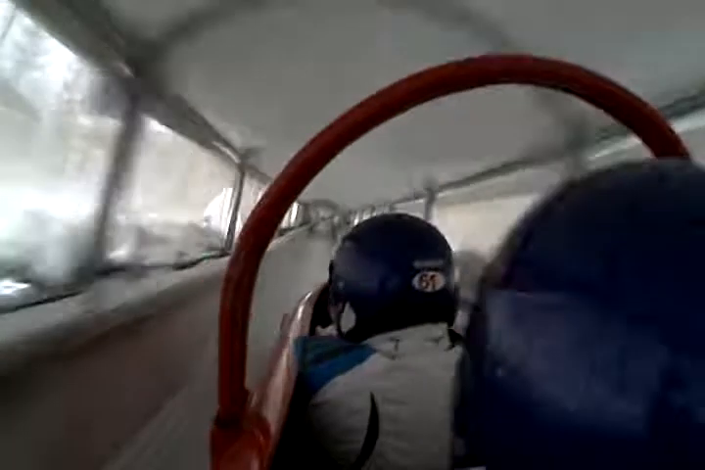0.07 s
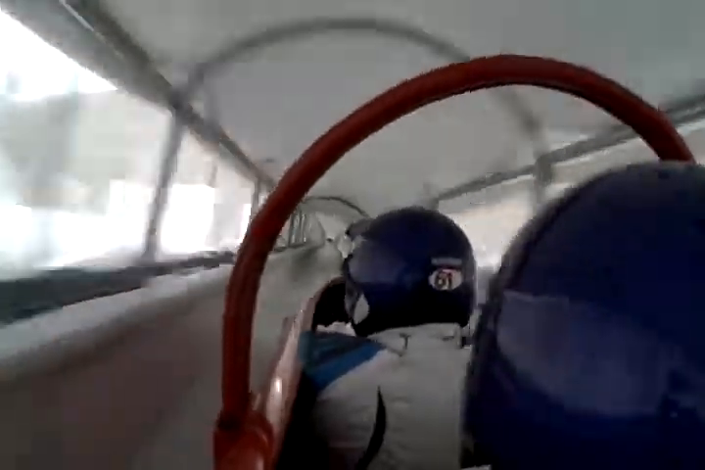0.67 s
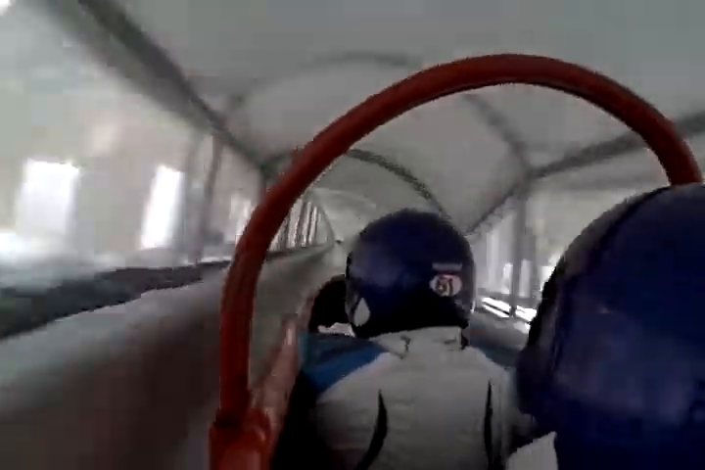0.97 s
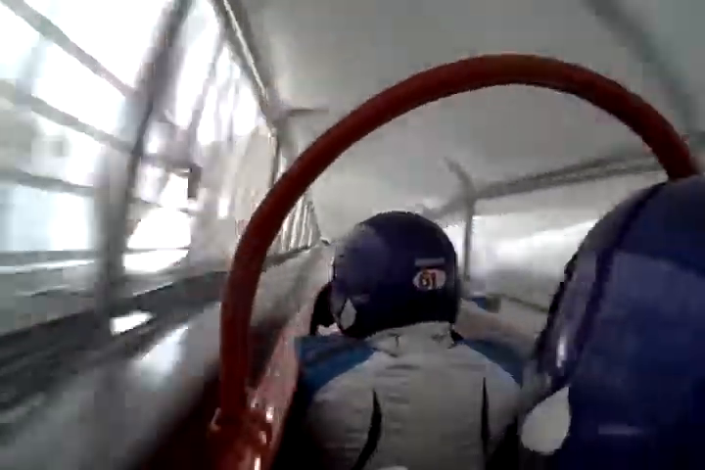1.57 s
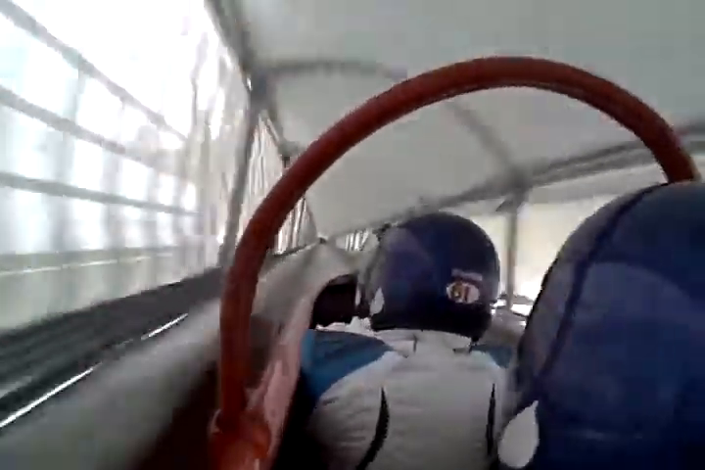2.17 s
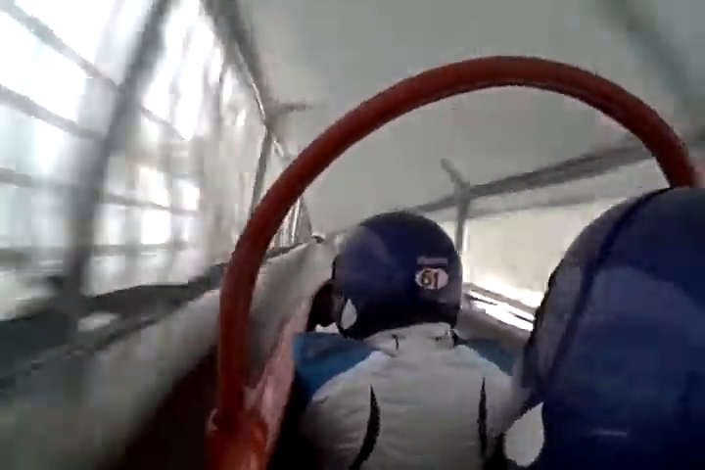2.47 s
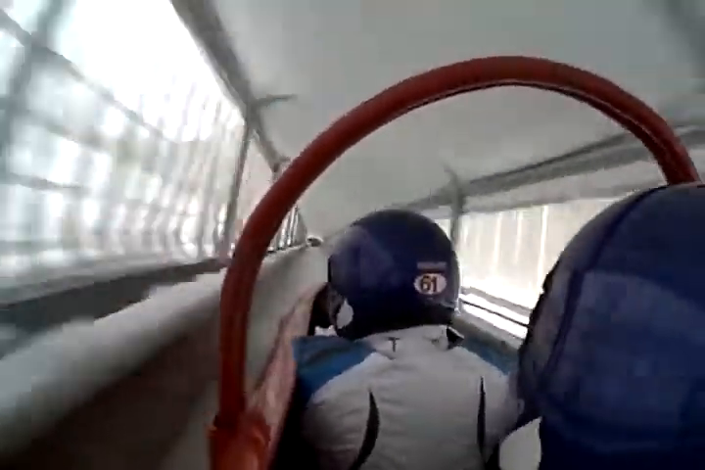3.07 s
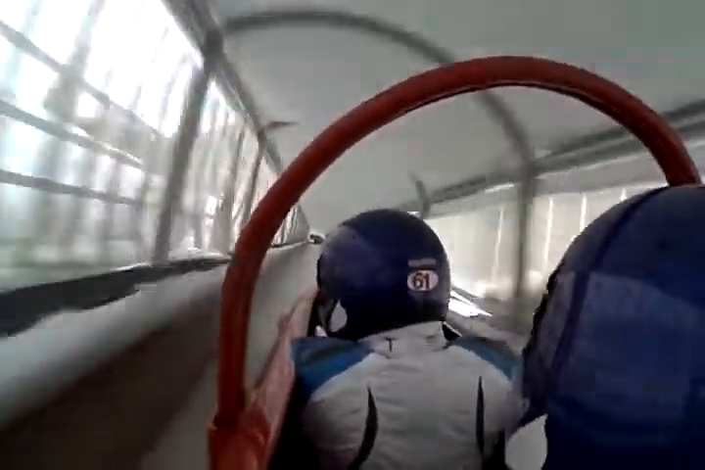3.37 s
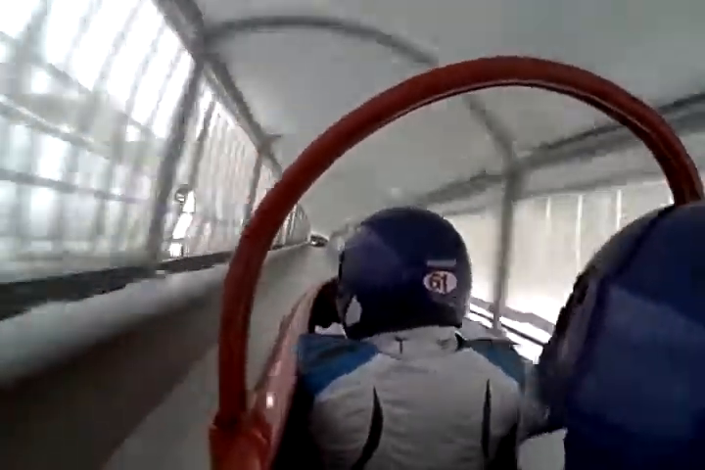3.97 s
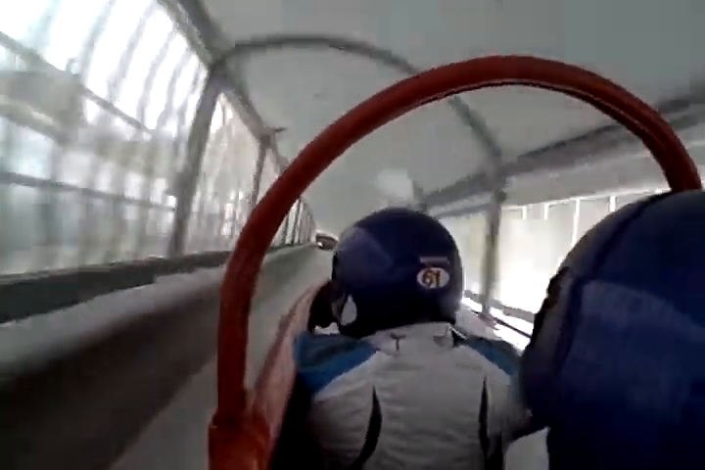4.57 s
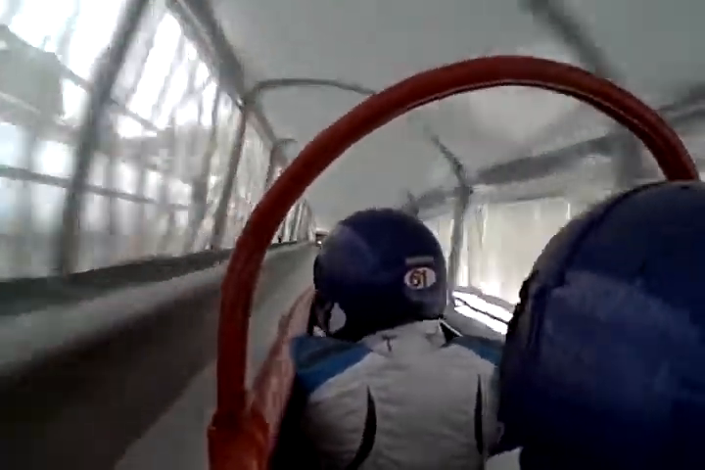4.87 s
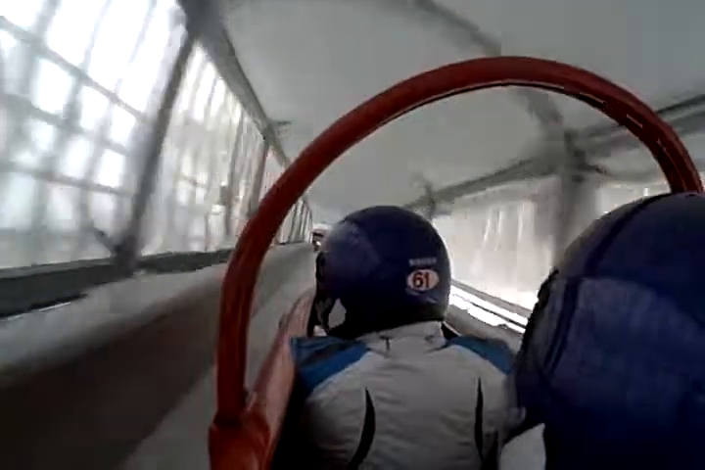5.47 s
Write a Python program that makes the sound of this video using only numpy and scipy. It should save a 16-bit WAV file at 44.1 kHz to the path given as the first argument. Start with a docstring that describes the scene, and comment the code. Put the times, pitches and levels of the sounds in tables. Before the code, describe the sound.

A bobsleigh runs down a roofed ice track for about five and a half seconds, heard close and muffled from a microphone in a closed case on board. The runners make a continuous low, juddering rumble with a midrange scrape, swelling over rough patches and throwing faint spurts of ice. Sharp, hollow ticks hit the case irregularly throughout. Low buffets of air push on it, strongest near 0.2, 1.2 and 3.4 seconds. The hull knocks once at 0.6 seconds, bangs in a quick, loud cluster from 1.7 to 2, and knocks again at 2.4. The rumble eases around 3.5 seconds, then returns abruptly at 3.75 with more knocks and rattling ticks until about 4.4. A duller thump lands near 5 seconds. From about 4 seconds a faint airy hiss grows, with thin wavering whistles and a slight ringing of the runners, continuing to the end.

```python
"""Bobsleigh ride

A bobsleigh runs down a roofed ice track, heard from a camera in a closed case on board.
Its runners (the steel blades) rumble over rough ice and throw up chips. The hull bangs against
the wall, sharp ticks hit the case, and swirls of air push on it. Late in the ride, as the sled
gets faster, a hiss grows, with thin whistles and a faint singing of the runners."""
import sys
import numpy as np
from scipy import signal
from scipy.fft import rfft, irfft, next_fast_len
from scipy.io import wavfile
from scipy.ndimage import uniform_filter1d

SR = 44100
rng = np.random.default_rng(int(sys.argv[2]) if len(sys.argv) > 2 else 0)


def waveform_to_disk(signal):
    """Save audio, clipped to [-1, 1], as 16-bit WAV at the path in sys.argv[1]."""
    frames = np.transpose(np.atleast_2d(signal))
    scaled = np.clip(frames, -1, 1) * 32767
    samples = np.round(scaled).astype(np.int16)
    wavfile.write(sys.argv[1], SR, samples)


N = 242991
TIME = np.arange(N) / SR


def runners(rumble_trim_db=0.72, scrape_trim_db=-1.38, boom_db=-31, boom_follows=0.52,
            spray_db=-62.5, spray_follows=1.11, judder_db=2.0, spray_judder_db=2.5):
    """Bumps in the ice shake the sled; rough patches make it louder, and its load judders."""
    # how hard the runners work on the ice: t/s, rumble/dB, scrape/dB (before the trims)
    ride = [(0, -27.5, -36), (0.35, -28.5, -35), (0.647, -29.5, -36.5), (0.97, -35.5, -42),
            (1.681, -36, -44), (1.81, -29, -29), (2.05, -31.5, -40), (2.801, -35, -44),
            (3.25, -37.5, -43.5), (3.45, -42, -52), (3.744, -37.5, -47.5), (3.77, -28, -33.5),
            (4.0, -30.5, -38.5), (4.361, -27, -33.5), (4.498, -28.5, -35.5), (4.75, -28.5, -31.5),
            (5.068, -33, -36.5), (5.261, -29, -29), (5.5, -32, -29)]
    # rough patches of ice: t/s, rise of rumble and scrape/dB, rise of boom/dB, length/s
    patches = [(0.037, 0.5, 4, 0.036), (0.242, 1.5, 6.5, 0.048), (0.323, 6.5, -0.5, 0.05),
               (0.385, 0, 13, 0.022), (0.83, 4.5, 6, 0.066), (1.142, 8, 5, 0.11), (1.388, 5.5, 1, 0.11),
               (1.637, 7, 7.5, 0.042), (2.38, 4, 2.5, 0.074), (2.667, 9, 6, 0.029), (2.944, 6.5, 4, 0.08),
               (3.876, 6.5, 10, 0.044), (4.2, 2.5, 9, 0.029), (4.431, 6, 4, 0.026)]
    # tone of the hull's boom, the rumble, the scrape and the ice spray: f/Hz, relative level/dB
    boom_tone = [(25, -17.5), (42, -0.5), (62, -3.5), (90, -1), (120, -3.5), (165, -4.5), (230, -23.5),
                 (400, -35.5)]
    rumble_tone = [(120, -26.5), (175, 0), (222, 4), (270, -3.5), (330, -0.5), (400, -6), (480, -7),
                   (560, -4.5), (680, -14.5), (850, -21.5), (1400, -55.5)]
    scrape_tone = [(400, -26), (620, 3), (760, 5), (880, 6), (1000, 1.5), (1100, -3.5), (1190, -4.5),
                   (1350, -11), (1600, -19), (2100, -40), (3000, -56.5), (6000, -58)]
    spray_tone = [(700, -10.5), (1300, 3), (1900, 4.5), (2100, 2), (2400, 0), (3000, -5), (3600, -8),
                  (4500, -18), (5500, -19.5), (8000, -25)]
    times, rumbles, scrapes = np.transpose(ride)
    ride_db = np.interp(TIME, times, rumbles)
    rough_db = sum(db * swell(s, length_s) for s, db, _, length_s in patches)
    heave_db = sum(db * swell(s, length_s) for s, _, db, length_s in patches)
    # the boom follows the rumble, but swings less
    boom_gain = from_db(boom_db + boom_follows * (ride_db - ride_db.mean()) + heave_db)
    rumble_gain = from_db(ride_db + rough_db)
    scrape_gain = from_db(np.interp(TIME, times, scrapes) + rough_db)
    # the rougher the ride, the more ice the runners throw
    work_db = 10 * np.log10(rumble_gain * scrape_gain)
    spray_gain = from_db(spray_db + spray_follows * (work_db - work_db.mean()))
    load = drift(30)
    bumps = grains(per_s=4000, spread_db=2.0) * from_db(judder_db * load)
    ridges = grains(per_s=2600, spread_db=2.0) * from_db(judder_db * load)
    chips = grains(per_s=9000, spread_db=2.5) * from_db(spray_judder_db * load)
    boom = boom_gain * rms_one(colour(rng.standard_normal(N), boom_tone))
    rumble = from_db(rumble_trim_db) * rumble_gain * rms_one(colour(bumps, rumble_tone))
    scrape = from_db(scrape_trim_db) * scrape_gain * rms_one(colour(ridges, scrape_tone))
    spray = spray_gain * rms_one(colour(chips, spray_tone))
    return boom + rumble + scrape + spray


def knocks(attack_s=0.0017, soft_extra_s=0.0045, soft_hz=480, hard_db=-26, steady_s=0.014,
           floor_attack_s=0.0047):
    """Each blow rings the hull, crushes ice and thumps the floor; soft ones are dull and rise slowly."""
    # the hull hits a wall or bump: t/s, level/dB, contact/s, decay/s, relative crunch/dB, thump/dB
    blows = [(0.572, -16, 0.0037, 0.079, -52, -19.5), (1.734, -15.5, .003, 0.13, -45, -6.5),
             (1.769, -12.5, 0.0086, 0.075, -14, -15), (1.798, -20, 0.018, 0.099, -26.5, -29),
             (1.8694, -16.5, 0.0094, 0.095, -17.5, -16), (1.947, -20.5, 0.003, 0.15, -27.5, -32),
             (2.431, -20, .003, 0.14, -29, -33), (3.29, -46.5, 0.0079, 0.2, -40, -22),
             (3.752, -18.5, 0.017, 0.055, -29.5, -21.5), (3.811, -26.5, .003, 0.046, -18, -25),
             (3.867, -22.5, 0.0059, 0.089, -25.5, -24.5), (3.888, -22, 0.0083, 0.059, -27, -27.5),
             (4.169, -25, 0.0036, 0.037, -23, -22), (4.344, -21, 0.023, 0.19, -28.5, -20),
             (5.049, -25, 0.0071, 0.19, -35, -16.5)]
    # tone of crushed ice: f/Hz, relative level/dB
    crunch_tone = [(500, -9.5), (950, 11), (1350, 2), (1750, 6), (1980, 5), (2150, -1), (2400, -1),
                   (3400, -11), (4200, -20), (6000, -26.5), (7500, -35.5)]
    # the floor panel's dull ring: f/Hz, relative level/dB, time to fade by 60 dB/s
    floor_modes = [(282, 0, 0.061), (482, -12, 0.13)]
    contacts = grains(per_s=5000, spread_db=3.5)
    ringing = hull(contacts)
    bang = even(ringing, steady_s)
    thud = even(signal.sosfilt(signal.butter(3, soft_hz, fs=SR, output="sos"), ringing), steady_s)
    crunch = even(colour(contacts, crunch_tone), steady_s)
    out = np.zeros(N)
    for s, db, contact_s, decay_s, crunch_db, thump_db in blows:
        span = slice(int(s * SR), int((s + .5) * SR))
        age = TIME[span] - TIME[span][0]
        hardness = min(from_db(crunch_db - hard_db), 1)  # more crunch means a harder blow
        rise = (1 - np.exp(-age / (attack_s + soft_extra_s * (1 - hardness)))) ** 2
        hold_then_fade = from_db(db - 60 * np.maximum(age - contact_s, 0) / decay_s)
        body = hardness * bang[span] + np.sqrt(1 - hardness ** 2) * thud[span]
        out[span] += rise * hold_then_fade * (body + from_db(crunch_db) * crunch[span])
        floor = sum(from_db(mode_db - 60 * age / fade_s) * np.sin(2 * np.pi * hz * age)
                    for hz, mode_db, fade_s in floor_modes)
        out[span] += from_db(thump_db) * (1 - np.exp(-age / floor_attack_s)) * floor
    return out


def hull(x, damping_hz=1700):
    """The sled's shell rings at its own pitches (its modes) and lets little treble through."""
    # the shell's modes: f/Hz, width/Hz, relative level/dB
    hull_modes = [(222.4, 37, 4), (275, 51, -4.5), (323, 59, 3), (517, 80, 2), (573.5, 35, 10.5),
                  (925, 178, 1.5), (992, 116, -1), (1180, 20, -32.5)]
    return signal.sosfilt(signal.butter(3, damping_hz, fs=SR, output="sos"), modes(x, hull_modes))


def ticks(crack_boost_db=21, ring_boost_db=29.5, ring_ratio=1.338, ring_lag_s=0.00024, thump_db=-8,
          thump_band_hz=(300, 720), spot_db=2.5, spot_detune=0.062, notch_hz=2100, notch_width_hz=230):
    """A hit on the case gives a faint crack, then a very short, hollow ring over a duller thump."""
    # small hard hits: t/s, crack/dB, ring/dB (both before the boosts), ring pitch/Hz
    hits = [(.15, -28, -16.5, 874), (.3131, -29, -18.5, 1010), (0.5441, -27, -12.5, 905),
            (0.7915, -27.5, -16.5, 885), (.962, -38, -23, 905), (1.127, -23, -13.5, 867),
            (1.3602, -32.5, -15, 880), (1.452, -43, -22, 875), (1.7247, -43, -26.5, 900),
            (1.7724, -30, -23, 850), (1.7872, -33, -16, 860), (1.8178, -28, -17, 870),
            (1.9423, -28.5, -16, 885), (2.2425, -38, -23.5, 906), (2.325, -44, -32, 990),
            (2.3553, -40, -20.5, 910), (2.378, -44, -31, 1010), (2.436, -44, -24.5, 840),
            (2.8433, -44, -17.5, 870), (2.867, -35.5, -19.5, 910), (3.092, -36, -20, 870),
            (3.185, -44, -25.5, 920), (3.6528, -47, -27, 940), (3.822, -38, -15, 900),
            (3.8367, -40, -24, 900), (4.1397, -34, -16.5, 874), (4.1968, -45, -16.5, 876),
            (4.2166, -45, -15, 880), (4.2294, -42, -29, 940), (4.2416, -48, -30, 900),
            (4.3206, -44, -16.5, 760), (4.528, -37, -16.5, 910), (4.5775, -51, -16, 760),
            (4.749, -38, -16, 870), (4.799, -46, -26, 965), (4.876, -33, -16.5, 916),
            (4.9908, -40, -21.5, 950), (5.1992, -43, -20.5, 950), (5.29, -49, -15, 840)]
    # modes of the case's walls: f/Hz, width/Hz, relative level/dB
    wall_modes = [(1460, 60, -13.5), (1850, 130, -14), (2380, 380, -3), (2710, 350, -10),
                  (3650, 210, -19.5), (4180, 400, -18), (5100, 530, -25.5)]
    # tone of the crack: f/Hz, relative level/dB
    crack_tone = [(600, -19.5), (1400, -6.5), (2500, -9), (3500, -21), (6500, -32.5), (8400, -26)]
    click = np.zeros(SR // 10)
    click[0] = 1
    mount = signal.butter(2, thump_band_hz, "band", fs=SR, output="sos")
    thump = from_db(thump_db) * signal.sosfilt(mount, click)
    strikes, out = np.zeros((2, N + len(click)))
    spots = rng.standard_normal((len(hits), len(wall_modes), 2))  # each spot rings differently
    for (s, crack_db, ring_db, hz), spot in zip(hits, spots):
        at, ring_at = round(s * SR), round((s + ring_lag_s) * SR)
        strikes[at] = from_db(crack_db + crack_boost_db)
        spot_modes = [(wall_hz * (1 + spot_detune * higher), width, db + spot_db * louder)
                      for (wall_hz, width, db), (louder, higher) in zip(wall_modes, spot)]
        out[at:at + len(click)] += strikes[at] * modes(click, spot_modes)
        cavity = signal.butter(3, [hz / ring_ratio, hz * ring_ratio], "band", fs=SR, output="sos")
        ring = signal.sosfilt(cavity, click)
        out[ring_at:ring_at + len(click)] += from_db(ring_db + ring_boost_db) * (ring - thump)
    # the case passes almost nothing in one narrow band, which makes its ticks hollow
    notch = signal.iirnotch(notch_hz, notch_hz / notch_width_hz, fs=SR)
    return signal.lfilter(*notch, out[:N] + colour(strikes[:N], crack_tone))


def wind(push_db=-22.5, fall_db_per_s=0.75, swirl_band_hz=(4.03, 16), steady_s=0.2, flutter_db=1.5):
    """Swirls of air push slowly on the case, weakening apart from gusts; the airflow hisses."""
    # gusts: t/s, rise/dB, length/s
    gusts = [(.3, 3.4, 0.78), (2.199, 1.1, 0.089), (4.08, 5.4, 0.24), (5.07, 8.3, 0.061)]
    # tone of the rushing air: f/Hz, relative level/dB
    air_tone = [(650, -4.5), (900, 0), (1200, 13.5), (1650, -7.5), (1920, 1), (2120, -5.5), (2400, 1.5),
                (2700, -11.5), (3100, -6), (3850, -8.5), (4250, -30), (8000, -52)]
    gust_db = sum(db * swell(s, length_s) for s, db, length_s in gusts)
    push = from_db(push_db - fall_db_per_s * TIME + gust_db)
    swirl_band = signal.butter(2, swirl_band_hz, "band", fs=SR, output="sos")
    swirls = signal.sosfilt(swirl_band, rng.standard_normal(N))
    hiss = speed_gain() * rms_one(colour(grains(per_s=6500, spread_db=3.5), air_tone))
    return push * even(swirls, steady_s) + hiss * from_db(flutter_db * drift(10))


def buffets():
    """A large swirl of air is one swing of pressure: a push, then a pull."""
    # large swirls that strike the case: t/s, peak/dB, length/s
    swirls = [(0.205, -9.5, 0.044), (0.366, -16.5, 0.063), (1.155, -11, 0.052), (2.116, -19.5, 0.092),
              (2.258, -17.5, 0.036), (2.726, -21, 0.062), (3.409, -12.5, 0.05)]
    peak_to_one = 2 * np.exp(.5)
    return sum(from_db(db) * peak_to_one * (s - TIME) / length_s * swell(s, length_s)
               for s, db, length_s in swirls)


def spurts(trim_db=-3, powder_hz=4000):
    """A runner's edge shaves off spurts of ice: coarse chips with more or less fine powder."""
    # spurts of ice: t/s, level before the trim/dB, length/s, extra powder/dB
    shaves = [(0.22, -53, 0.011, -3), (0.278, -53.5, .008, 2), (0.48, -55, 0.009, -2),
              (0.511, -49, 0.009, 3.5), (0.596, -46, 0.017, -3.5), (0.64, -52, 0.0083, 2),
              (0.833, -56.5, .014, 0), (1.006, -55, 0.011, -1), (1.195, -48.5, 0.018, -1),
              (1.499, -55, 0.022, -0.5), (1.66, -61, 0.014, 6), (1.747, -56, .008, 4),
              (1.914, -55, 0.012, 5), (1.998, -43.5, 0.009, -14), (2.033, -42, 0.0038, -5),
              (2.658, -60, 0.0069, -8), (2.937, -55, 0.0076, 11), (3.818, -53, 0.0063, 5),
              (3.904, -58, 0.021, 9), (4.19, -59.5, 0.015, 7.5), (4.386, -67, 0.094, 10),
              (5.294, -64.5, .06, -3.5)]
    # tone of the shavings: f/Hz, relative level/dB
    shavings_tone = [(900, -2.5), (2000, 7), (3000, -7), (4500, -12.5), (6500, -15.5), (8000, -22.5)]
    shavings = rms_one(colour(grains(per_s=7000, spread_db=5.5), shavings_tone))
    powder = signal.sosfiltfilt(signal.butter(3, powder_hz, "high", fs=SR, output="sos"), shavings)
    chips = shavings - powder
    return sum(from_db(db + trim_db) * swell(s, length_s) * (chips + from_db(powder_db) * powder)
               for s, db, length_s, powder_db in shaves)


def whistles(width_hz=34, steady_s=0.022, waver_db=3.0):
    """Edges in the airflow give thin, wavering tones, each only around one airspeed."""
    # when each edge whistles: t/s, level/dB, length/s, f/Hz
    edges = [(3.95, -83, .25, 3320), (4.43, -69.5, 0.35, 3433), (5.195, -71, 0.2, 2570),
             (5.25, -59, .16, 1874)]
    out = np.zeros(N)
    for s, db, length_s, hz in edges:
        narrow_noise = resonate(rng.standard_normal(N), hz, width_hz)
        tone = even(resonate(narrow_noise, hz, width_hz), steady_s)
        out += swell(s, length_s) * from_db(db + waver_db * drift(12)) * tone
    return out


def singing(relative_db=-12.5, wander=0.0084, wander_hz=3):
    """Fine ice grains keep the runners ringing faintly; the pitch wavers slowly and randomly."""
    # modes of the steel runners: f/Hz, width/Hz, relative level/dB
    steel_modes = [(1880, 49, 2), (1980, 70, -3), (2400, 70, -4), (2600, 45, -6.5), (3020, 43, -11),
                   (3960, 88, -16.5)]
    ringing = rms_one(modes(grains(per_s=3200, spread_db=-1.0), steel_modes))
    position = np.cumsum(1 + wander * drift(wander_hz)) % N  # reading faster raises the pitch
    return from_db(relative_db) * speed_gain() * np.interp(position, np.arange(N), ringing)


def electronics(hiss_db=-85, whine_db=-94, whine_hz=8000):
    """The camera's electronics hiss and whine faintly."""
    whine = rms_one(np.sin(2 * np.pi * whine_hz * TIME))
    return from_db(hiss_db) * rng.standard_normal(N) + from_db(whine_db) * whine


def speed_gain():
    """Gain of the sounds that grow with speed: they start late and surge near the end."""
    # strength of the airflow's hiss: t/s, level/dB
    hiss_levels = [(3.75, -91), (3.98, -71.5), (4.15, -68), (4.4, -63), (4.8, -52), (4.95, -55), (5.1, -55),
                   (5.22, -52), (5.5, -48.5)]
    return from_db(np.interp(TIME, *np.transpose(hiss_levels)))


def grains(per_s, spread_db):
    """Random tiny impacts of uneven size, with an average level of 1."""
    sizes = from_db(spread_db * np.minimum(rng.exponential(1, N), 4))
    return rms_one(sizes * rng.choice([-1, 1], N) * (rng.random(N) < per_s / SR))


def drift(rate_hz):
    """A slow random wobble, about 1 in size."""
    r = np.exp(-80 * np.pi * rate_hz / SR)
    noise = rng.standard_normal(N // 40 + 2002)  # one value for every 40 samples
    slow = signal.lfilter([1], [1, -2 * r, r * r], noise)[2000:]
    return np.interp(np.arange(N) / 40, np.arange(len(slow)), rms_one(slow))


def swell(s, length_s):
    """A smooth hump of height 1 around the time s."""
    out, near = np.zeros(N), np.abs(TIME - s) < 3 * length_s
    out[near] = np.exp(-2 * ((TIME[near] - s) / length_s) ** 2)
    return out


def colour(x, tone):
    """Filter x to follow a tone table, falling 18 dB per octave beyond its ends."""
    size = 2 * next_fast_len(N)
    hz, db = np.transpose(tone)
    grid = np.maximum(np.fft.rfftfreq(size, 1 / SR), 1)
    octaves_beyond = np.log2(grid / np.clip(grid, hz[0], hz[-1]))
    shape_db = np.interp(np.log(grid), np.log(hz), db) - 18 * np.abs(octaves_beyond)
    # minimum phase: the filter rings only after a hit, never before it
    cepstrum = irfft(np.log(from_db(shape_db)))
    cepstrum[1:size // 2] *= 2
    cepstrum[size // 2 + 1:] = 0
    return irfft(rfft(x, size) * np.exp(rfft(cepstrum)))[:N]


def modes(x, table):
    """Let x ring at several pitches at once, added with alternating signs."""
    return sum((-1) ** k * from_db(db) * resonate(x, hz, width)
               for k, (hz, width, db) in enumerate(table))


def resonate(x, hz, width_hz):
    """Let x ring at one pitch, with a gain of 1 there."""
    r = np.exp(-np.pi * width_hz / SR)
    feedback = [1, -2 * r * np.cos(2 * np.pi * hz / SR), r * r]
    return signal.lfilter(np.array([1, 0, -1]) * (1 - r * r) / 2, feedback, x + 1e-18)


def even(x, window_s):
    """Hold the level of a random vibration near 1."""
    power = uniform_filter1d(x * x, max(int(window_s * SR), 1))
    return x / np.sqrt(np.abs(power) + 1e-20)


def rms_one(x):
    """Scale to an average level (rms) of 1."""
    return x / np.sqrt(np.mean(x ** 2) + 1e-20)


def from_db(db):
    """Turn decibels into a gain."""
    return 10 ** (np.asarray(db) / 20)


def scene():
    """All the sounds add up in one channel."""
    background = electronics()
    sled = runners() + spurts() + knocks() + ticks()
    air = wind() + whistles() + buffets()
    return (sled + air + singing() + background)[None]


def record(dry, cutoff_hz=8300, fade_s=0.008):
    """Cut the highest treble steeply, and fade the last moment so it ends without a click."""
    fade = np.clip((TIME[-1] - TIME) / fade_s, 0, 1)
    return signal.sosfilt(signal.ellip(10, .2, 80, cutoff_hz, fs=SR, output="sos"), dry * fade)


dry = scene()
out = record(dry)
waveform_to_disk(out)
```